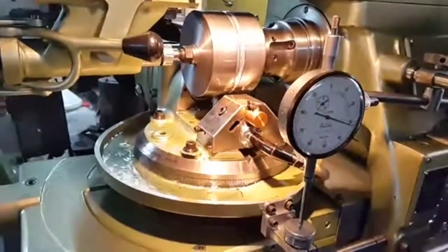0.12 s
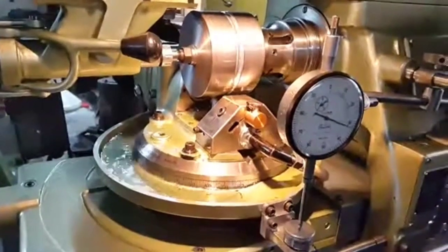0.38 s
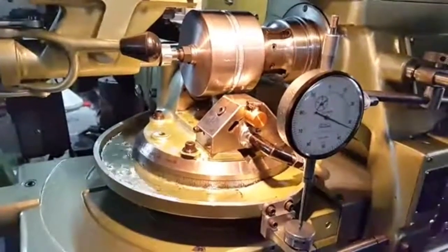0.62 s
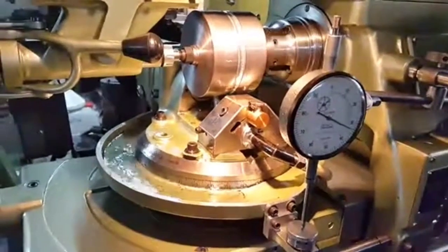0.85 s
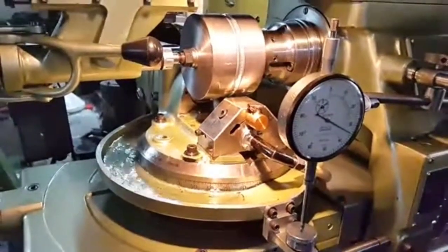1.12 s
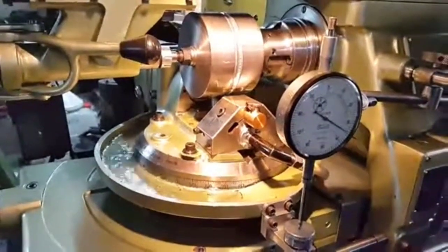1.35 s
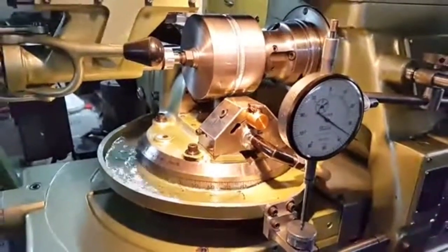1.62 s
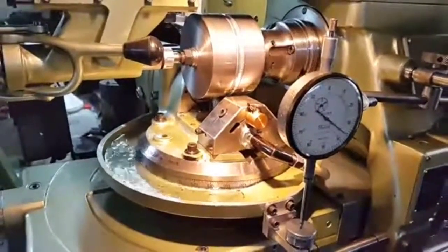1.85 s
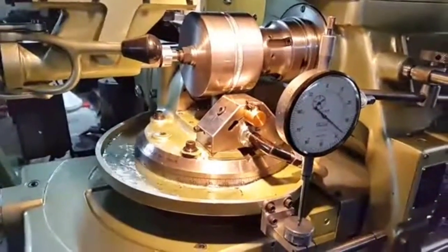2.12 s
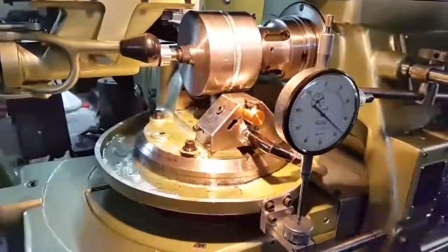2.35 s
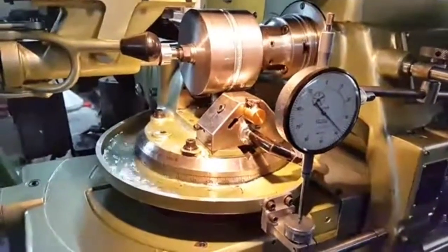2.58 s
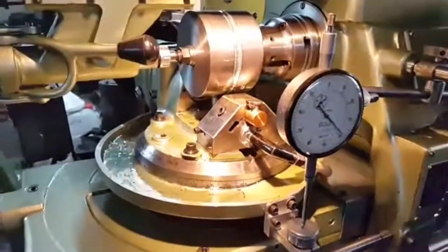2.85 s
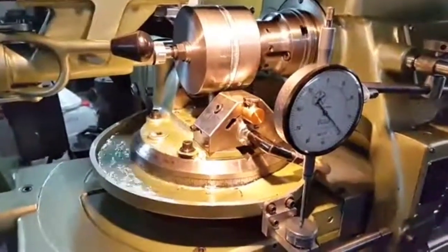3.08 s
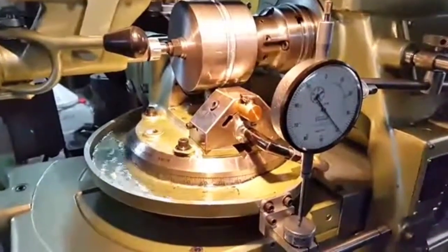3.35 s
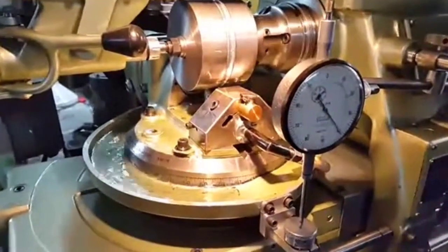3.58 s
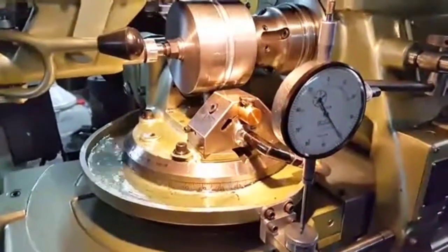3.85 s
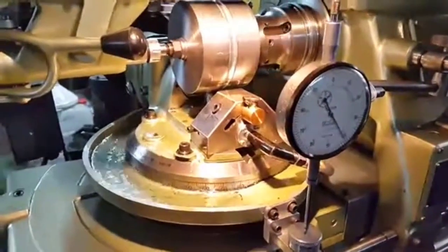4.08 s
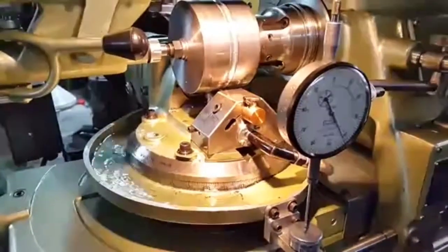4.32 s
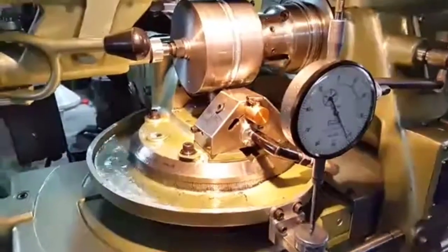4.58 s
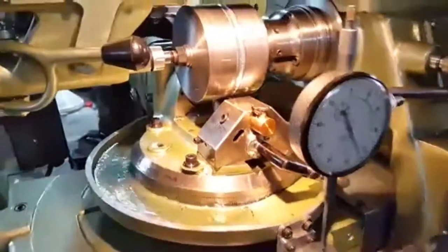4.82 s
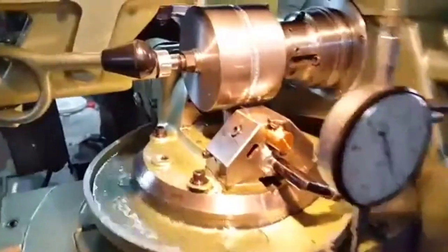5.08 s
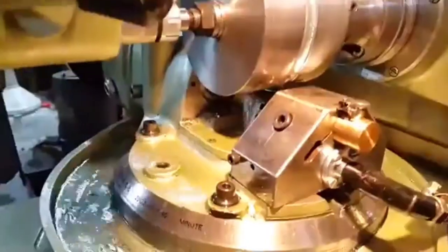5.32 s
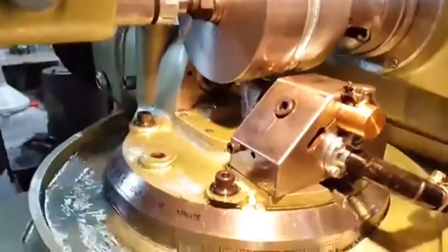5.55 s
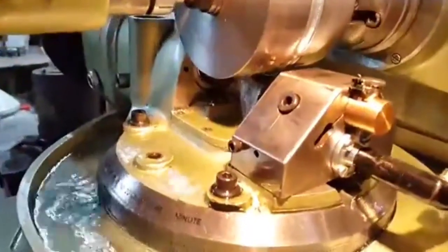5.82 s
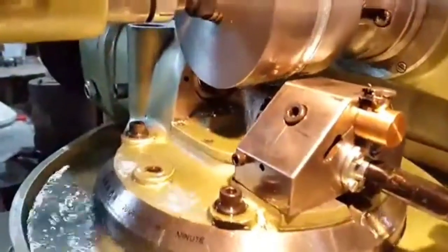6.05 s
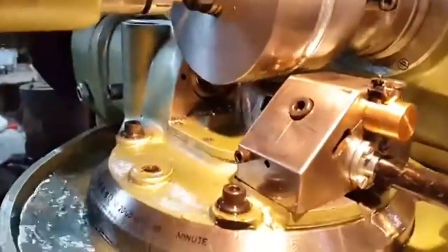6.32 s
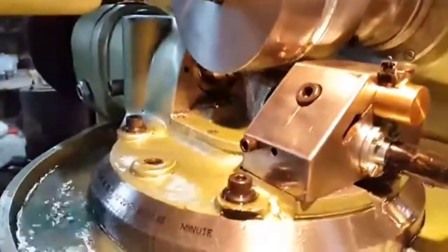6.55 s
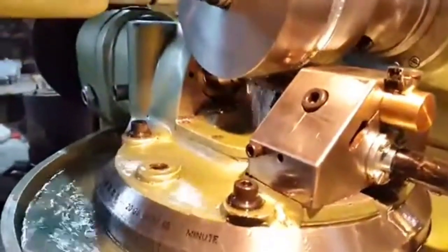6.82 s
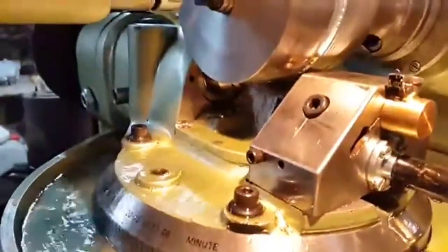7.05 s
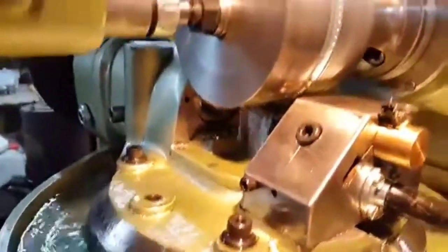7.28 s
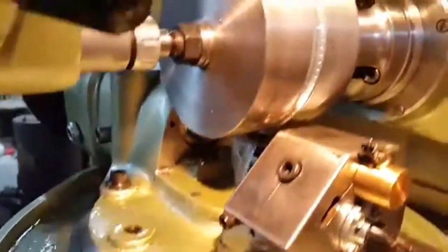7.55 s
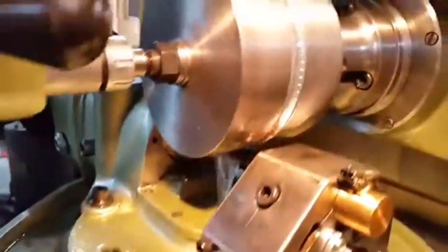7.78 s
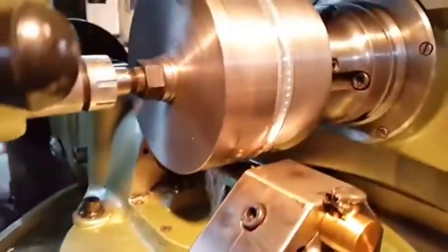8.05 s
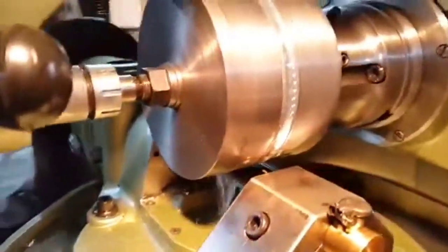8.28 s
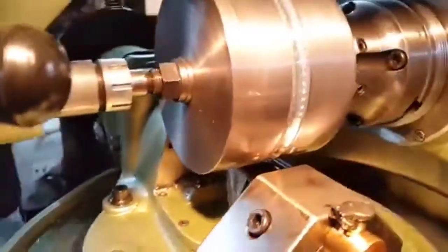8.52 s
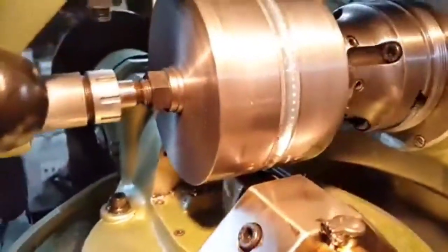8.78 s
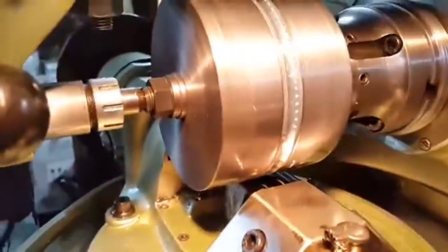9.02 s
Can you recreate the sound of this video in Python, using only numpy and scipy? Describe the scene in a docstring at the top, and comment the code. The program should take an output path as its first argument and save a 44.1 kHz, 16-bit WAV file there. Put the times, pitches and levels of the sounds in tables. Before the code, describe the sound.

A gear-cutting machine is already running in a workshop. The sound starts low and swells to full level within about the first second. A dense midrange roar rings the metal casing, mixed with steady gear hums, wavering whines and a low hum that slowly beats. Cutter strokes pulse about 22 times a second, giving a fast purring flutter with small metallic rattles and thin, patchy treble hiss. At about 4.4 seconds there is one thin, sharp tick. Near 5.3 seconds the sound drops out for roughly four hundredths of a second, then returns closer and brighter beside the cutter. Harder ringing knocks stand out from 6.3 to 8.3 seconds, clustering around 7.4 to 8.0. From about 7.6 seconds the microphone moves towards the spindle; random knocks recede and the gear tones grow stronger, firmer and steadier. The machine keeps running to the end, with an uneven, wide left-right spread.

```python
"""A gear-cutting machine whirs steadily in a workshop, heard from a hand-held camera that moves in closer.
Gear teeth hum at whole multiples of one shaft speed, over noise that rings the casing; treble noise lies on top.
Regular cutter strokes swell the noise and knock rings out of the tool holder; one thin tick is heard.
The sound swells up at the start and drops out once at an edit, where stroke and hum timing start afresh.
Left and right are mixed from one signal and an echoed copy of it."""
import sys
import numpy as np
from scipy import signal
from scipy.fft import rfft, irfft, next_fast_len
from scipy.io import wavfile
from scipy.ndimage import uniform_filter1d

SR = 44100
rng = np.random.default_rng(int(sys.argv[2]) if len(sys.argv) > 2 else 0)


def ratio_of_db(decibels):
    """Turn decibels (scalar or array-like) into linear amplitude factors; 0 dB maps to 1."""
    return 10 ** (np.asarray(decibels, float) / 20)


def wav_record(signal):
    """Record a signal, one row per channel, as 16-bit PCM in the file named by sys.argv[1]."""
    frames = np.transpose(np.atleast_2d(signal))
    bounded = np.clip(frames, -1, 1)
    # unit amplitude maps onto the largest positive 16-bit level
    quanta = np.round(bounded * 32767).astype(np.int16)
    wavfile.write(sys.argv[1], SR, quanta)


N = 403515
T = np.arange(N) / SR  # time in seconds

# Source levels are those before the fade-in and the left-right mix.
# Camera path: time_s, place (0 wide, 1 near the cutter, 2 near the spindle)
CAMERA_PATH = [(0, 0.0084), (5.29, 0.058), (5.32, 0.57), (7.0, 1.01), (7.6, 1.03), (8.3, 1.84),
               (9.15, 2.06)]
# Broad roar of the machine: pitch_hz, level_db (per Hz)
ROAR_SPECTRUM = [(20, -87), (60, -74), (110, -62.5), (270, -58.5), (410, -60.5), (480, -52), (1100, -50.5),
                 (1400, -59), (2700, -58), (3300, -68), (4300, -72), (5500, -78), (7200, -81.5),
                 (8200, -100)]
# Casing resonances: pitch_hz, width_hz, then wide_db, cutter_db, spindle_db (peak per Hz at each place)
CASING_RESONANCES = [(191, 20, -54.5, -56, -51), (273, 15, -50, -53.5, -61),
                     (356.8, 14.3, -54.5, -49.5, -52), (542, 55, -54, -55, -48), (601.4, 16, -49, -42, -38),
                     (724.4, 35, -44, -43, -45.5), (804, 59, -48.5, -45.5, -44.5),
                     (878, 86, -48.5, -57.5, -46.5), (940, 48, -47, -44, -54),
                     (1016, 16, -45, -40.5, -37.5), (1048, 30, -43, -45.5, -44.5),
                     (1085, 17, -49, -48.5, -40), (1214, 35, -52, -52, -59), (1656, 390, -67, -55.5, -56.5),
                     (2010, 370, -62, -54, -53.5), (2035, 60, -50, -48, -49), (2536, 58, -52, -54, -67),
                     (3020, 810, -89, -65.5, -66), (3732, 464, -67.5, -57.5, -61.5),
                     (6540, 250, -95, -72.5, -81)]
# Treble hiss: pitch_hz, level_db (per Hz)
HISS_SPECTRUM = [(8300, -100), (9200, -83.5), (10000, -77.5), (11100, -78), (12000, -72.5), (13600, -82.5),
                 (14800, -83), (15200, -120)]
# Cutter stroke rate: before_edit_per_s, after_edit_per_s
STROKE_RATES = [22.545, 22.592]
# Moment of one stroke: before_edit_s, after_edit_s
STROKE_MOMENTS = [.0217, 5.3548]
# Gear mesh tones: order (multiple of the shaft speed)
MESH_ORDERS = [20, 25, 29, 30, 49, 50, 54, 55, 62, 77]
# Level of each mesh tone: wide_db, cutter_db, spindle_db
MESH_LEVELS = [(-47.5, -44, -49), (-39, -46, -48), (-45.5, -52, -44), (-44, -65, -48), (-44, -34, -33.5),
               (-41.5, -35.5, -29.5), (-40.5, -33, -32), (-30, -28, -23), (-33, -29.5, -23),
               (-33, -36, -34)]
# Whines that are not tied to the shaft: pitch_hz
WHINE_PITCHES = [430.7, 541.7, 640.6, 834.4, 1128.5, 1331, 1703.8]
# Level of each whine: wide_db, cutter_db, spindle_db
WHINE_LEVELS = [(-48, -40, -52), (-44, -39.5, -40), (-42, -48.5, -48), (-37.5, -36, -46), (-39.5, -32, -45),
                (-44.5, -41, -47), (-45.5, -53, -44)]
# A moment when the two low hums cancel most: before_edit_s, after_edit_s
HUM_QUIET_MOMENTS = [2.05, 6.5]
# Base strength of the random blows on the tool holder: wide_db, cutter_db, spindle_db
BLOW_LEVELS = [-28.5, -23, -38]
# The hardest single blows, before the holder rings: start_s, blow_db
HARD_BLOWS = [(6.3245, -14.5), (6.5101, -17), (6.6842, -16), (7.0778, -16), (7.3944, -17), (7.5203, -16),
              (7.648, -17), (7.8341, -18), (7.8755, -16), (7.9179, -15), (7.9478, -16), (8.014, -16),
              (8.0431, -11), (8.319, -14)]
# Ringing tones of the tool holder: pitch_hz, level_db, decay_s (time to fall 60 dB)
HOLDER_RINGS = [(2035, 9, 0.025), (2430, -8, 0.014), (4030, -26, .02)]
# Echoes in a loop: delay_slots, phase_turn (half turns per band), feedback (0-1)
ECHO_LOOPS = [(3, .43, .6514), (4, .75, .5647), (5, .347, .4895)]
# Left-right picture by band: from_hz, balance_db (left over right), likeness (-1 to 1)
STEREO_BANDS = [(0, -0.5, 0.94), (190, -2, 0.97), (358, -4.5, 0.73), (555, -9.5, 0.86), (740, -10.5, 0.76),
                (900, -13, 0.14), (1100, -9, -0.3), (1424, -2.3, 0.21), (1850, -4.3, -0.44),
                (2223, 0.7, 0.48), (2625, -1.5, 0.28), (3010, 3.5, 0.25), (3360, -8.5, 0.47),
                (4150, -4.5, 0.021), (5370, -12.5, -0.47), (6620, -47, 0.25), (9060, 1.0, 0.036),
                (13125, -2.5, 0.17)]
# Fainter parts of the spectrum than this are silenced: pitch_hz, limit_db (per Hz)
FAINT_LIMIT = [(3500, -105), (4800, -84), (5700, -74), (6300, -73), (7000, -75), (8800, -80), (9600, -93),
               (13000, -93), (14200, -77), (15500, -77)]

SHAFT_HZ = 9.088
HUM_ORDER, HUM_DB = 26, -35
PARTNER_DB, BEAT_HZ = -6, 0.4  # second hum: level against the first, distance above it
# Fade-in: start level against full, wait, time constant of the swell, full gain
START_DB, HOLD_S, CREEP_S, FULL_DB = -14, 0.22, 0.18, 0.82
SLOT_S, BAND_HZ = 64 / 48000, 375  # time and pitch steps of the echoes
TICK_S, TICK_DB = 4.4066, -17
CUT_S, BACK_S, RAMP_S = 5.283, 5.322, 0.012  # sound stops, starts to return, takes this long to return
SNAP_S, TRAIL_DB, TRAIL_DB_PER_S = 0.00072, -24.5, -1200  # fast closing and a faint trail that dies away


def curve(rows):
    """Joins (time, value) rows by straight lines."""
    return np.interp(T, *np.transpose(rows))


def read(points, hz):
    """Reads a spectrum table along a logarithmic pitch axis."""
    pitch, value = np.transpose(points)
    return np.interp(np.log(hz + 1), np.log(pitch + 1), value)


def drift(lo_hz, hi_hz):
    """Slow random wander of rms 1, cut below one rate and fading above another."""
    rate = 100  # points per second
    count = N // rate + 2
    hz = np.fft.rfftfreq(count, 1 / rate)
    shape = (hz > lo_hz) / (1 + (hz / hi_hz) ** 2)
    wander = irfft(rfft(rng.standard_normal(count)) * shape, count)
    return np.interp(np.arange(N) / rate, np.arange(count), wander / wander.std())


def by_place(values):
    """Cross-fades three values or sounds as the camera moves."""
    place = curve(CAMERA_PATH)
    return sum(v * np.maximum(1 - abs(place - k), 0) for k, v in enumerate(values))


def by_shot(values):
    """Gives the first value before the edit and the second after it."""
    return np.where(T < BACK_S, *values)


def throb():
    """A swell on every cutter stroke, each of its own strength, about 0-1."""
    strokes = (T - by_shot(STROKE_MOMENTS)) * by_shot(STROKE_RATES)
    nearest = np.round(strokes).astype(int)
    strength = rng.uniform(0.58, 1.0, 300)[nearest]
    return strength * np.exp(1.5 * (np.cos(2 * np.pi * strokes) - 1))


def rattle(level_db):
    """Tooth contact: dense noise with sparse harder taps, rms 1 overall."""
    taps = (rng.random(N) < 300 / SR) * rng.standard_normal(N) * 2.2
    noise = (rng.standard_normal(N) + taps) * ratio_of_db(level_db)
    return noise / noise.std()


def roar(flutter, strokes):
    """Rattle rings the casing, whose resonances balance differently at each camera place."""
    hz = np.fft.rfftfreq(N, 1 / SR)
    # The gear train fills the bass and the cutter the treble
    upper = 1 / (1 + (1400 / (hz + 1)) ** 8)
    train = rattle(0.2 * flutter + 0.59 * strokes)
    cutter_db = 0.41 * flutter + 0.86 * drift(5.4, 28) + strokes * by_place([2.2, 3.5, 3.5])
    cutter = rattle(cutter_db)
    drive = rfft(train) * np.sqrt(1 - upper) + rfft(cutter) * np.sqrt(upper)
    drive = drive * np.sqrt(SR / 2)  # so that levels count per Hz
    shapes = [1 / (1 + (2 * (hz - f) / width) ** 2) ** 2 for f, width, *_ in CASING_RESONANCES]
    broad = ratio_of_db(read(ROAR_SPECTRUM, hz)) ** 2
    sounds = []
    for k in range(3):
        peaks = sum(ratio_of_db(row[2 + k]) ** 2 * shape for row, shape in zip(CASING_RESONANCES, shapes))
        sounds.append(irfft(drive * np.sqrt(broad + peaks), N))
    return by_place(sounds)


def hiss(flutter, strokes):
    """Smooth treble noise that swells with the strokes and flickers a little on its own."""
    hz = np.fft.rfftfreq(N, 1 / SR)
    spectrum = rfft(rng.standard_normal(N)) * ratio_of_db(read(HISS_SPECTRUM, hz))
    noise = irfft(spectrum, N) * np.sqrt(SR / 2)
    return noise * ratio_of_db(0.5 * flutter + 2.3 * strokes + 0.5 * drift(1.6, 25))


def tone(hz, waver_db, wander):
    """A sine, rms 1 when steady, whose level wavers and whose phase wanders."""
    phase = 2 * np.pi * (hz * T + rng.random()) + wander * drift(0, 2.0)
    return np.sqrt(2) * np.sin(phase) * ratio_of_db(waver_db * drift(0.3, 6.8))


def hum():
    """Two low hums a fraction of a hertz apart strengthen and weaken each other in turn."""
    phase = 2 * np.pi * (HUM_ORDER * SHAFT_HZ * T + rng.random()) + 0.11 * drift(0, 2.3)
    beat = 2 * np.pi * BEAT_HZ * (T - by_shot(HUM_QUIET_MOMENTS))
    pair = np.sin(phase) - ratio_of_db(PARTNER_DB) * np.sin(phase + beat)
    return np.sqrt(2) * pair * ratio_of_db(HUM_DB + 1.2 * drift(0.3, 14.0))


def gears():
    """Mesh tones on shaft multiples, whines and the low hum; tones are firmer near the spindle."""
    lines = [(order * SHAFT_HZ, db) for order, db in zip(MESH_ORDERS, MESH_LEVELS)]
    lines += list(zip(WHINE_PITCHES, WHINE_LEVELS))
    waver_db, wander = by_place([2.5, 1.6, 0.8]), by_place([0.55, 0.4, 0.2])
    out = 0
    for hz, levels_db in lines:
        blur = 2.24 if hz > 600 else 1  # higher tones are less steady
        out = out + tone(hz, waver_db * blur, wander * blur) * by_place(ratio_of_db(levels_db))
    return out + hum()


def knocks(strokes):
    """Uneven blows, bunched on the strokes, ring the tool holder, a little sharp or flat by where they land."""
    size_db = by_place(BLOW_LEVELS) + 1.85 * np.minimum(rng.exponential(1, N), 4)
    size = ratio_of_db(size_db) * rng.choice([-1, 1], N)
    blows = size * (rng.random(N) < (30 + 150 * strokes ** 2) / SR)
    for start_s, blow_db in HARD_BLOWS:
        blows[round(start_s * SR)] = ratio_of_db(blow_db)
    t = T[:3000]
    spot = rng.integers(-1, 2, N)
    out = 0
    for k in (-1, 0, 1):
        ring = 0
        for hz, db, decay_s in HOLDER_RINGS:
            ring = ring + ratio_of_db(db - 60 * t / decay_s) * np.sin(2 * np.pi * hz * (1 + 0.02 * k) * t)
        ring = ring * (1 - np.exp(-t / 0.0014))  # soft onset
        out = out + signal.oaconvolve(blows * (spot == k), ring)[:N]
    return out


def fader():
    """The gain holds low, then swells smoothly to full."""
    u = np.maximum(T - HOLD_S, 0) / CREEP_S
    return ratio_of_db(FULL_DB) * (1 - (1 - ratio_of_db(START_DB)) * (1 + u) * np.exp(-u))


def echoed(hz):
    """Response of the copy: three all-pass echoes (shifting time, not level), plain delay in the treble."""
    def delay(slots):
        return np.exp(-2j * np.pi * hz * SLOT_S * slots)

    out, band = 0, hz / BAND_HZ - 0.5
    for k in (np.floor(band), np.floor(band) + 1):  # neighbouring bands overlap
        centre = np.where(k < 3, k + 0.25 + 0.5 * (band > k), k + 0.5)  # the low bands are halved
        fade = np.clip(1 - 0.05 * (k - 3), 0, 1)  # less feedback in higher bands
        response = delay(2) * np.exp(-0.39j * np.pi * centre)
        for slots, turn, feedback in ECHO_LOOPS:
            z = delay(slots) * np.exp(-1j * np.pi * turn * centre)
            response = response * (z - feedback * fade) / (1 - feedback * fade * z)
        response = np.where(k < 23, response, np.where(k < 35, delay(14), delay(1)))
        out = out + response * np.clip(0.5 + 3 * (0.5 - abs(band - k)), 0, 1)
    return out


def ducked(copy, mono):
    """The copy is turned down, band by band, wherever the signal falls well under its recent peak."""
    frames = dict(nperseg=236, noverlap=177)  # about one slot a hop
    power = uniform_filter1d(abs(signal.stft(mono, **frames)[2]) ** 2, size=3, axis=0) + 1e-20
    # The remembered peak shrinks to 0.766 of itself each hop
    fall = -np.log(0.766) * np.arange(power.shape[1])
    peak = np.exp(np.maximum.accumulate(np.log(power) + fall, axis=1) - fall)
    mean, gap = signal.lfilter([0.25], [1, -0.75], [power, peak - power])
    gain = np.minimum(1, mean / (1.3 * abs(gap) + 1e-20))
    return signal.istft(signal.stft(copy, **frames)[2] * gain, **frames)[1][:N]


def spread_out(mono):
    """Each side mixes the signal with its echoed copy by the band's balance and likeness."""
    size = next_fast_len(N + SR)
    hz = np.fft.rfftfreq(size, 1 / SR)
    edges, balance_db, likeness = np.transpose(STEREO_BANDS)
    band = np.clip(np.searchsorted(edges, hz) - 1, 0, None)
    ratio = ratio_of_db(uniform_filter1d(balance_db[band], size=600))
    right = np.sqrt(2) / np.hypot(1, ratio)
    left = ratio * right
    # Mixing angles: a wider angle makes the sides less alike
    spread = np.arccos(np.clip(uniform_filter1d(likeness[band], size=600), -1, 1)) / 2
    lean = spread * (right - left) / np.sqrt(2)
    direct = rfft(mono, size)
    echo = irfft(direct * echoed(hz), size)[:N]
    copy = rfft(ducked(echo, mono), size)
    sides = []
    for gain, angle in ((left, spread), (right, -spread)):
        sides.append(gain * (np.cos(lean + angle) * direct + np.sin(lean + angle) * copy))
    return irfft(np.array(sides), size)[:, :N]


def limited(x):
    """Peaks above the knee are rounded off."""
    knee, room = 0.75, 0.2
    over = np.maximum(abs(x) - knee, 0)
    return x - np.sign(x) * (over - room * np.tanh(over / room))


def gated(x):
    """Silences short moments of each pitch that are fainter than the limit, which leaves weak treble patchy."""
    frames = dict(fs=SR, nperseg=2048, noverlap=1024, window="cosine", scaling="psd")
    hz, _, z = signal.stft(x, **frames)
    limit = ratio_of_db(read(FAINT_LIMIT, hz)) * (hz > FAINT_LIMIT[0][0])
    keep = abs(z).max(0) * np.sqrt(2) > limit[:, None]  # the louder side decides for both
    return signal.istft(z * keep, **frames)[1][:, :N]


def tick():
    """One thin sharp tick in both channels: a very short bump with a dip on either side."""
    u = (T - TICK_S) / 0.000025
    return ratio_of_db(TICK_DB) * (1 - u ** 2) * np.exp(-u ** 2 / 2)


def edit():
    """The gain is shut for a moment between two shots, then opens over a short ramp."""
    since = np.maximum(T - CUT_S, 0)
    closing = np.maximum(1 - since / SNAP_S, ratio_of_db(TRAIL_DB + TRAIL_DB_PER_S * since))
    opening = np.clip((T - BACK_S) / RAMP_S, 0, 1) ** 2
    return np.maximum(closing, opening)


def scene():
    """Roar, hiss, knocks and gear tones as one signal, fed to both channels."""
    flutter, strokes = drift(2, 4.8), throb()
    mono = roar(flutter, strokes) + hiss(flutter, strokes) + knocks(strokes) + gears()
    return np.array([mono, mono])


def roll_off(x):
    """The treble ends steeply here."""
    return signal.sosfilt(signal.butter(12, 15630, fs=SR, output="sos"), x)


def record(dry):
    """Fade-in, left-right spread, rounded peaks and patchy treble; then the edit and the tick."""
    mono = dry[0] * fader()
    sides = gated(limited(spread_out(mono)))
    mix = sides * edit() + tick()
    return roll_off(mix)


dry = scene()
out = record(dry)
wav_record(out)
```